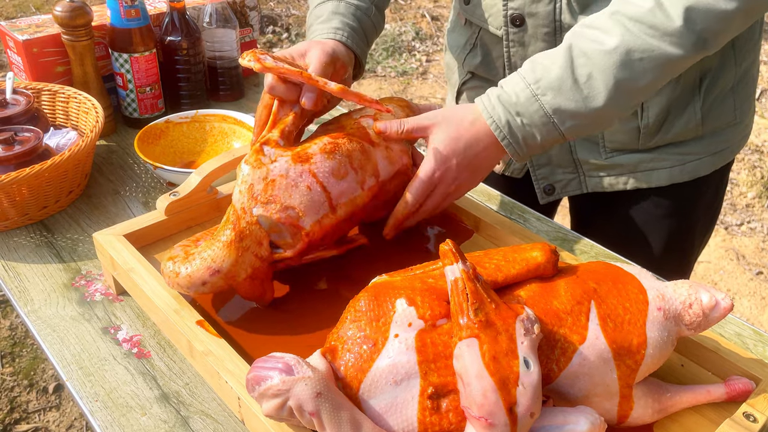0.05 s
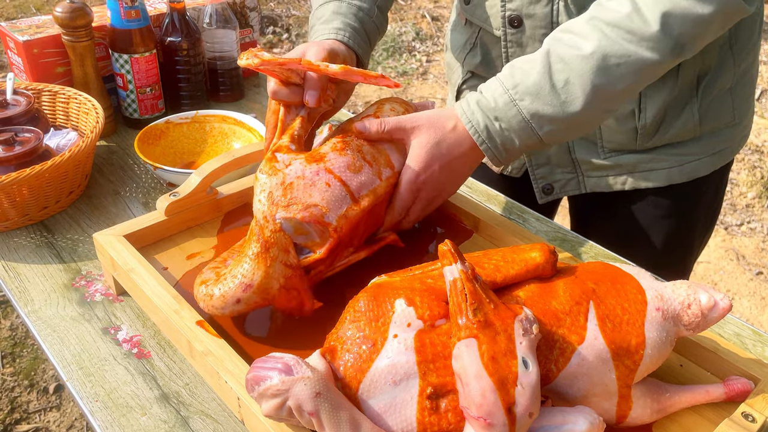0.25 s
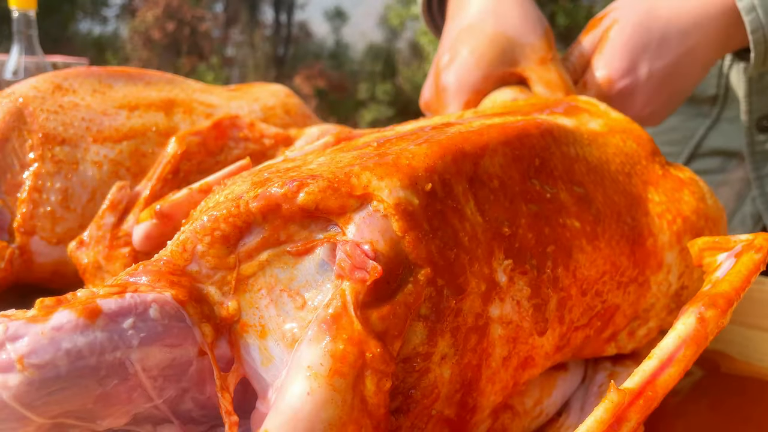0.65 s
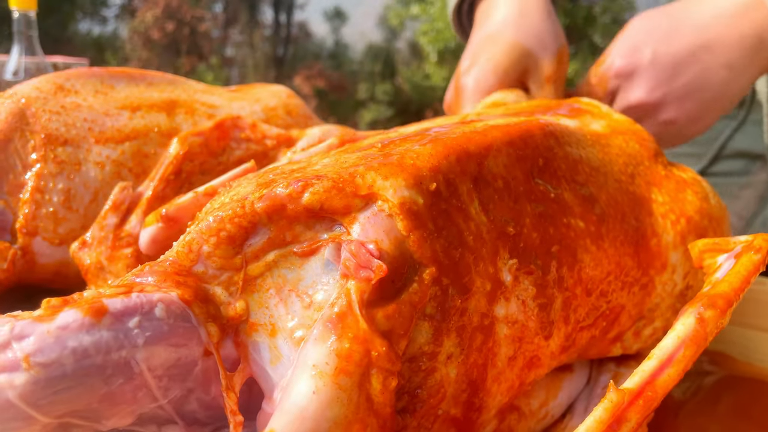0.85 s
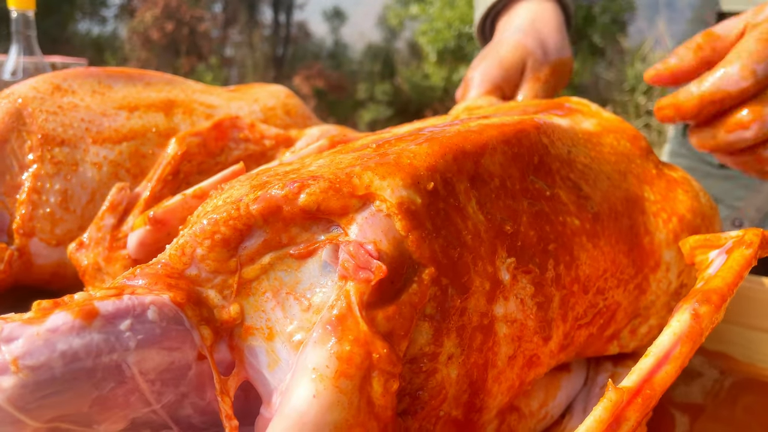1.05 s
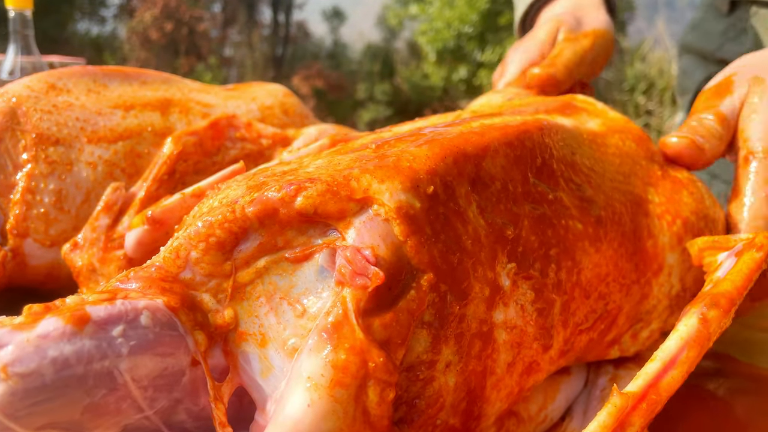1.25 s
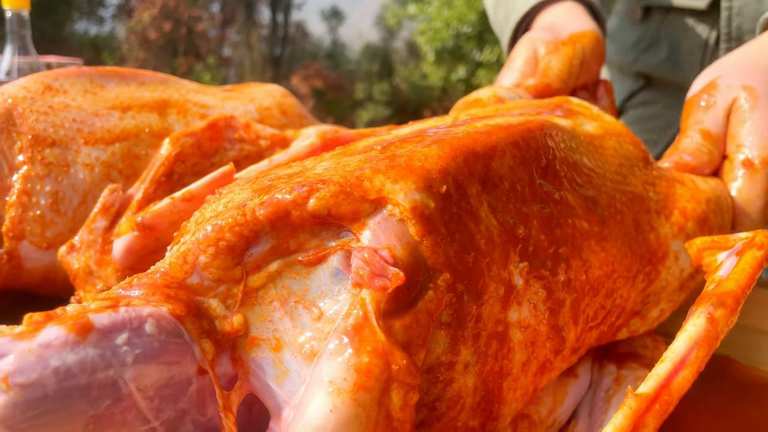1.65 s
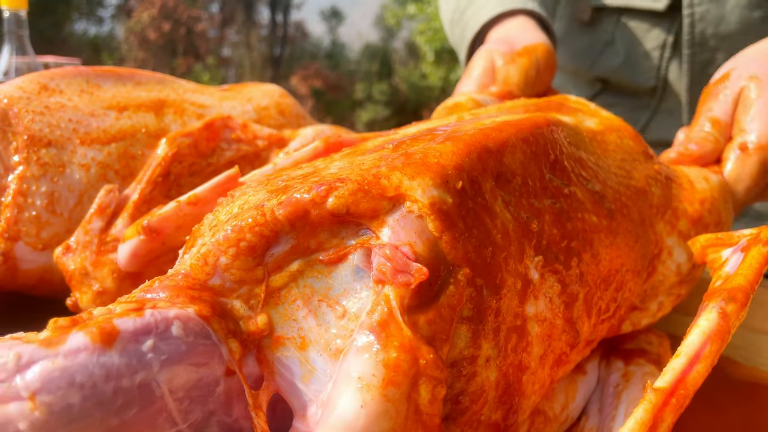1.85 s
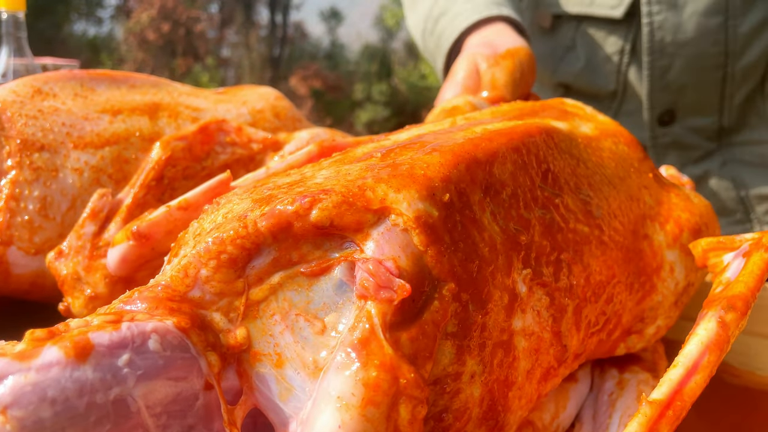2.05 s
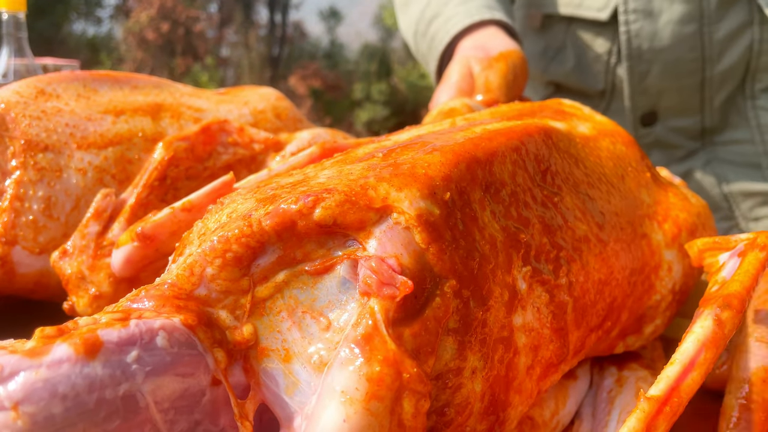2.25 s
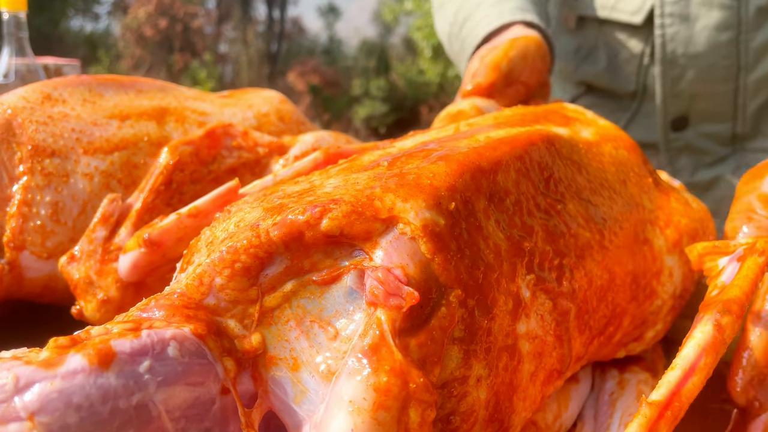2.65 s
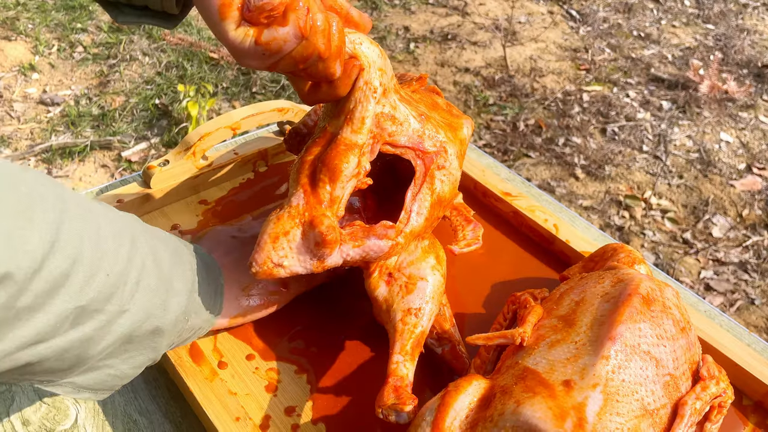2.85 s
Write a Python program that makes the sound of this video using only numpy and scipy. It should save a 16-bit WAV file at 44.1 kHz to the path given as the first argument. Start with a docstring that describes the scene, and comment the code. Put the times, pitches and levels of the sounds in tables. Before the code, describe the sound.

Wet rubbing, sticky smacks and soft thuds of hands on raw poultry, with distant bird chatter.

```python
"""Hands work wet marinade into a raw bird on a wooden tray, outdoors, close by, over a faint hush.
From the start, palms rub wet skin and the flesh thuds and rumbles on the tray.
From 0.5 s, a wild bird further off chatters in short rasping notes, echoed by the trees.
From 1.3 s, the work gets firmer: the sticky film smacks and pops, the tray rings, fingers squeak.
At 2.4 s comes the sharpest smack, then a jacket sleeve swishes and the flesh thuds once more."""
import sys
import numpy as np
from scipy import signal
from scipy.fft import rfft, irfft, next_fast_len
from scipy.io import wavfile
from scipy.ndimage import uniform_filter1d, map_coordinates

SR = 44100
rng = np.random.default_rng(int(sys.argv[2]) if len(sys.argv) > 2 else 0)


def transcribe(signal):
    """Save signal, clipped to [-1, 1], as a 16-bit WAV file at the path in sys.argv[1]."""
    frames = np.atleast_2d(signal).T
    limited = np.clip(frames, -1, 1)
    pcm = np.round(limited * 32767).astype(np.int16)
    wavfile.write(sys.argv[1], SR, pcm)


N = 132300
T = np.arange(N) / SR

# flesh on the tray (peak time [s], level [dB], pitch [Hz], left-right [dB])
THUDS = [(0.223, -44.5, 98, 6.5), (0.288, -40.5, 71.6, 2.5), (0.612, -41.5, 125, 0.5),
         (0.684, -41.5, 95, 3), (0.712, -43.5, 164, 3), (.742, -45.5, 108, -3), (0.831, -51, 344, -0.5),
         (1.063, -48.5, 134, 5.5), (1.24, -47, 104, 11), (1.3446, -44, 183, 3.5), (1.394, -49, 260, 2),
         (1.349, -43, 85.5, 9), (1.412, -44, 90, 6), (1.484, -35, 109, 13), (1.481, -44, 240, 2),
         (1.511, -40.5, 135, 7), (1.568, -48, 280, 0), (1.595, -35.5, 273, 2), (1.62, -44, 116, 3),
         (1.656, -45.5, 175, 0), (1.674, -39.5, 88, 8), (1.725, -40.5, 190, 4.5), (1.798, -48, 194, 3),
         (1.834, -49.5, 166, 5), (1.956, -37, 90, -0.5), (1.949, -45.5, 224, 3), (2.335, -47.5, 176, 6),
         (2.736, -41.5, 100, 5.5), (2.756, -47, 196, 4)]
# rumble envelope (time [s], level [dB])
RUMBLE_ENVELOPE = [(0.0, -65), (0.02, -56), (0.15, -67), (0.29, -49.5), (0.39, -58), (0.6, -47),
                   (0.645, -49), (0.69, -43.5), (0.79, -52.5), (0.93, -51.5), (0.98, -46.5), (1.04, -56),
                   (1.14, -47), (1.18, -55.5), (1.25, -44), (1.31, -59), (1.34, -44), (1.46, -41),
                   (1.48, -41), (1.91, -54), (1.96, -47), (2.0, -55.5), (2.11, -51.5), (2.13, -48),
                   (2.33, -57.5), (2.39, -46), (2.43, -50), (2.64, -58), (2.66, -44.5), (2.75, -45.5),
                   (2.77, -50), (2.97, -57.5), (3.0, -75)]
# rumble colour (frequency [Hz], level [dB])
RUMBLE_SPECTRUM = [(15, -47), (30, -20.5), (45, -2), (60, 2), (75, -2), (100, -9.5), (135, -17), (200, -27),
                   (300, -35.5), (500, -54.5), (1000, -72)]
# wet smacks (time [s], level [dB], decay [s], tilt [dB/octave], air pocket [Hz], left-right [dB])
SMACKS = [(.451, -55, 0.00089, -1, 5300, 9), (0.624, -65.5, 0.0028, 4, 6800, -2),
          (0.781, -56.5, 0.0025, 5, 9300, -3), (0.827, -71, .004, -10, 1200, 0),
          (1.2644, -41.5, 0.0038, 2, 3150, -0.5), (1.288, -54, 0.0028, 4, 6340, 7),
          (1.3235, -46.5, 0.0046, -0.5, 6400, -4.5), (1.341, -36.5, .0036, 1.5, 2800, -0.5),
          (1.384, -48, .0025, -6, 2000, 2), (1.3906, -42.5, 0.0033, 5, 6900, 7.5),
          (1.392, -41.5, 0.0029, 2, 7060, 2), (1.483, -50, 0.011, -0.5, 2060, -2),
          (1.651, -60, .0016, 27, 10800, -11), (1.741, -62, 0.0079, 3, 9800, -3),
          (1.783, -52.5, 0.0014, -5, 1600, -10), (1.902, -55, 0.0024, 0, 7000, -3),
          (2.0995, -48, .003, 10, 6650, 7), (2.363, -42.5, 0.0058, 0, 2070, 2),
          (2.378, -48, 0.0097, -4.5, 6650, -4), (2.3893, -25.5, 0.0013, -1.5, 9700, -4.5),
          (2.39, -29, 0.0025, 0, 2530, -4.5), (2.565, -36.5, 0.0025, -4, 1610, -7),
          (2.676, -50, 0.0019, -0.5, 9000, -9.5)]
# tearing film colour (frequency [Hz], level [dB])
SNAP_SPECTRUM = [(200, -4.5), (600, -12), (1000, -12), (1600, 1.5), (2500, -2), (3500, -6.5), (5000, -10.5),
                 (5750, -22), (6500, -9.5), (8000, -16), (9400, -12), (11000, -19), (13000, -35)]
# crackling stretches (start [s], length [s], level [dB])
CRACKLES = [(0.43, 0.034, -62.5), (1.264, .16, -58.5), (1.715, 0.047, -66), (1.831, 0.047, -64),
            (2.108, .19, -64.5), (2.359, .05, -61)]
# bursting air pockets (time [s], level [dB], pitch [Hz], left-right [dB])
POPS = [(1.3435, -50, 2200, -13), (1.393, -44, 6850, 1), (2.092, -55.5, 6760, -7), (2.1, -48.5, 6710, -4),
        (2.3906, -37.5, 9250, -16.5), (2.3912, -37, 2510, -11), (2.564, -43, 1586, -6.5)]
# knocks on the tray (time [s], level [dB])
KNOCKS = [(1.343, -49), (1.393, -47.5), (1.483, -53.5), (2.391, -51)]
# tray modes (frequency [Hz], level [dB], T60 [s])
TRAY_MODES = [(430, -15, 0.021), (551, -5, 0.066), (595, -5, 0.052), (1220, -32, 0.12), (1670, -24, 0.018),
              (2090, -5.5, 0.028)]
# palm strokes (start [s], length [s], level [dB], tilt [dB/octave], palm hollow [Hz])
RUBS = [(0.029, 0.18, -66, 0.5, 1200), (0.2, 0.12, -73.5, -0.5, 1580), (0.315, 0.053, -63, -1.5, 850),
        (0.427, 0.016, -67.5, .5, 1460), (0.457, 0.097, -74.5, 1, 2000), (0.769, 0.24, -71.5, 0, 1450),
        (1.022, 0.13, -73, 0, 577), (1.256, 0.051, -66, 3.5, 570), (1.334, 0.12, -65.5, 1.5, 560),
        (1.465, 0.16, -63.5, -2.5, 382), (1.589, 0.35, -72.5, 1, 390.5), (1.839, 0.041, -63.5, -1.5, 2370),
        (1.883, 0.2, -74.5, 0, 1800), (2.075, 0.25, -65, 0.4, 3000), (2.115, 0.24, -67, -1, 446),
        (2.344, 0.065, -59.5, 1.5, 2400), (2.405, 0.058, -64, -0.5, 1280), (2.791, 0.058, -68, -2, 970)]
# skin friction colour (frequency [Hz], level [dB])
RUB_SPECTRUM = [(80, -43), (250, -2.5), (400, -0.5), (600, -1.5), (780, -4.5), (1100, -11), (1600, -7.5),
                (2050, -6), (2640, -12.5), (3500, -16), (5450, -22), (8000, -25.5), (9300, -26),
                (12200, -37), (15000, -78)]
# finger stick-slip runs (start [s], length [s], level [dB], pitch [Hz], left-right [dB])
SQUELCHES = [(0.166, 0.032, -60, 1960, -7.5), (0.425, 0.02, -62, 1530, -2), (1.047, 0.021, -59, 2030, -7),
             (1.6995, 0.032, -53.5, 1840, -8), (1.736, 0.011, -54.5, 2120, -4.5),
             (1.843, 0.041, -64, 2400, -13), (1.907, .014, -58, 2110, -5.5),
             (1.937, 0.026, -65.5, 1640, -8), (2.797, 0.027, -63, 2360, -13.5)]
# sleeve swish (time [s], level [dB])
SLEEVE_ENVELOPE = [(2.42, -96), (2.46, -72.5), (2.52, -63), (2.57, -56.5), (2.625, -59), (2.668, -67),
                   (2.74, -86)]
# cloth colour (frequency [Hz], level [dB])
CLOTH_SPECTRUM = [(300, -7.5), (620, -5.5), (950, -14.5), (1230, -3), (1420, -7.5), (1600, 0), (1850, -7),
                  (2380, -2.5), (3100, -14.5), (3900, -7.5), (4700, -14), (5250, -10), (5500, -7),
                  (5850, -13.5), (7200, -12), (8000, -11.5), (9300, -15.5), (12200, -42), (15000, -66)]
# cloth balance (frequency [Hz], left-right [dB])
CLOTH_PAN = [(400, 1), (1200, -6.5), (3000, -4.5), (7000, -2.5), (8200, 4), (9300, -21.5), (12000, -19)]
# wild bird's notes (start [s], length [s], level [dB], pitch [Hz])
BIRD_NOTES = [(0.46, 0.025, -61, 3227), (0.518, 0.024, -63, 3210), (0.755, 0.021, -65.5, 3200),
              (0.796, 0.023, -62.5, 3230), (0.843, 0.017, -59.5, 3230), (0.894, 0.013, -59, 3188),
              (1.381, 0.01, -68, 3180), (1.418, 0.021, -63.5, 3270), (1.467, 0.018, -66.5, 3230),
              (1.513, 0.024, -64, 3197), (1.569, 0.023, -66, 3180), (2.068, 0.011, -71, 2910),
              (2.115, 0.017, -70.5, 3150), (2.162, 0.011, -64.5, 3170), (2.197, 0.021, -67, 3230),
              (2.262, 0.015, -67.5, 3156), (2.793, 0.016, -72.5, 2950), (2.847, 0.0076, -69.5, 3050),
              (2.876, 0.0053, -75, 2930)]
# throat resonance (frequency [Hz], level [dB])
THROAT_SPECTRUM = [(600, -56), (1200, -20.5), (1600, -8.5), (2400, -19), (2850, -2.5), (3200, -2),
                   (3500, -1), (4200, -11.5), (5000, -17), (7000, -136)]
# tree echo colour (frequency [Hz], level [dB])
ECHO_SPECTRUM = [(700, -59), (1500, -43), (2400, -1), (2900, 3), (3300, 11.5), (3700, 4), (4300, 2),
                 (5200, -31), (7000, -34)]
# hush colour (frequency [Hz], level [dB])
AIR_SPECTRUM = [(30, -27), (200, -9), (400, 1), (600, -1.5), (800, -2.5), (1100, -9.5), (1600, -6.5),
                (2500, -12.5), (4000, -13), (5600, -17), (8000, -18.5), (9400, -21.5), (11000, -24),
                (13000, -43)]
# hush balance (frequency [Hz], left-right [dB])
AIR_PAN = [(200, 0), (1500, -3), (7000, 3.5), (9400, -12.5), (12000, -5.5)]

SKIN_PAN_DB = -3.5


def thuds(rise_cycles=0.32, fall_cycles=0.51, slack_s=0.0015, sag=0.32):
    """Each push of soft flesh swells, swings about two cycles and sags in pitch as it relaxes."""
    out = np.zeros((2, N))
    for peak_s, db, hz, pan_db in THUDS:
        cycles = hz * (T - peak_s)
        width_cycles = np.where(cycles < 0, rise_cycles, fall_cycles) + hz * slack_s
        swell = np.exp(-0.5 * (cycles / width_cycles) ** 2)
        swing = np.cos(2 * np.pi * (cycles - sag * (np.hypot(cycles, 1) - 1)))
        out += amp(db) * pan(pan_db) * swell * swing
    return out


def rumble(trim_db=-2.5, shove_db=2.5, shoves_per_s=22):
    """The carcass rumbles as it is pushed about in uneven shoves."""
    noise = coloured_noise(RUMBLE_SPECTRUM, correlation=0.85)
    power = uniform_filter1d(np.mean(noise ** 2, axis=0), size=1800)
    steady = noise / np.sqrt(np.abs(power) + 1e-6)
    return steady * envelope(RUMBLE_ENVELOPE, T) * amp(trim_db + shove_db * wobble(shoves_per_s))


def smacks():
    """Fingers land on wet skin and peel off."""
    out = np.zeros((2, N))
    for start_s, db, decay_s, tilt_db, pocket_hz, pan_db in SMACKS:
        add(out, start_s, pan(pan_db) * film_snap(db, decay_s, tilt_db, pocket_hz))
    return out


def film_snap(db, decay_s, tilt_db, pocket_hz, tail_db=-23.5, tail_s=0.011):
    """Sticky film tears in tiny snaps, coloured by the air pocket below; the tray reflects a tail."""
    t = T[:SR // 16]
    noise = stereo_noise(len(t), correlation=0.5)
    grain = np.exp(0.52 * np.repeat(rng.standard_normal(len(t)), 16)[:len(t)])
    pocket = lambda hz: resonance(hz, pocket_hz, db=8.5, octaves=0.23)
    burst = filtered(noise * grain, lambda hz: tilted(SNAP_SPECTRUM, hz, tilt_db) * pocket(hz))
    rise = 1 - np.exp(-t / (0.48 * decay_s))
    fall = np.exp(-t / decay_s) + amp(tail_db) * np.exp(-t / tail_s)
    shape = 2 * rise * fall
    return amp(db - 11) * unit_rms(burst * shape) * np.sqrt(np.mean(shape ** 2))


def crackle(ticks_per_s=130, centre_hz=3540, spread_octaves=0.59):
    """Threads of marinade part at random between the smacks."""
    out = np.zeros((2, N))
    for start_s, length_s, db in CRACKLES:
        for scatter_db, detune in rng.standard_normal((round(length_s * ticks_per_s), 2)):
            pocket_hz = centre_hz * 2 ** (spread_octaves * detune)
            tick = film_snap(db + scatter_db, decay_s=0.0027, tilt_db=0, pocket_hz=pocket_hz)
            add(out, start_s + length_s * rng.random(), pan(SKIN_PAN_DB) * tick)
    return out


def pops(life_cycles=5.8, glide=0.011):
    """Air pockets burst in the wet film and ring a few cycles, rising slightly in pitch."""
    out, t = np.zeros((2, N)), T[:SR // 40]
    for start_s, db, hz, pan_db in POPS:
        age = hz * t / life_cycles
        shape = (1 - np.exp(-2 * hz * t)) * np.exp(-age)
        ring = np.sin(2 * np.pi * hz * t * (1 + glide * np.tanh(age / 2)))
        add(out, start_s, amp(db) * pan(pan_db) * shape * ring)
    return out


def tray(pan_db=-11.5, rise_s=0.00026):
    """Firm contacts briefly ring the modes of the wood."""
    out, t = np.zeros((2, N)), T[:SR // 6]
    for start_s, db in KNOCKS:
        ring = np.zeros(len(t))
        for hz, mode_db, t60_s in TRAY_MODES:
            decay = amp(mode_db + rng.normal(0, 1.6) - 60 * t / t60_s)
            ring += decay * np.sin(2 * np.pi * hz * (1 + 0.02 * rng.normal()) * t)
        add(out, start_s, amp(db) * pan(pan_db) * ring * (1 - np.exp(-t / rise_s)))
    return out


def rubs(grains_per_s=300, rise_s=0.0025, fall_s=0.036):
    """A cupped palm drags over bumpy wet skin: grainy friction, swelling mid-stroke."""
    out, t = np.zeros((2, N)), T[:SR // 2]
    for start_s, length_s, db, tilt_db, hollow_hz in RUBS:
        grains = stereo_noise(len(t), correlation=0.14) * np.exp(0.23 * wobble(grains_per_s)[:len(t)])
        hollow = lambda hz: resonance(hz, hollow_hz, db=4.5, octaves=0.39)
        friction = filtered(rippled(grains), lambda hz: tilted(RUB_SPECTRUM, hz, tilt_db) * hollow(hz))
        press = gate(t, length_s, rise_s, fall_s)
        arch = 1 - 0.48 * (1 - np.sin(np.pi * np.minimum(t / length_s, 1)))
        add(out, start_s, amp(db) * pan(SKIN_PAN_DB) * press * arch * unit_rms(friction))
    return out


def rippled(x, depth_db=3, width_hz=172.5, life_s=0.0284):
    """Narrow resonances come and go at random under the palm."""
    hz, t, spectra = signal.stft(x, SR, nperseg=512)
    grid = np.array(np.meshgrid(hz / width_hz, t / life_s, indexing="ij"))
    ripple = map_coordinates(rng.standard_normal((256, 32)), grid, mode="mirror")
    return signal.istft(spectra * amp(depth_db * ripple), SR, nperseg=512)[1][:, :x.shape[1]]


def squelches(period_s=0.0064):
    """Fingers stick and slip on skin: an uneven run of short damped tones."""
    out, t = np.zeros((2, N)), T[:SR // 80]
    for start_s, length_s, db, hz, pan_db in SQUELCHES:
        cycles = hz * t
        for k, (jitter, detune, size) in enumerate(rng.standard_normal((10, 3))):
            offset_s = period_s * (k + 0.087 * jitter)
            slip = cycles * np.exp(1 - cycles) * np.sin(2 * np.pi * cycles * (1 + 0.1 * detune))
            fade = np.clip((length_s - offset_s) / period_s, 0, 1)
            add(out, start_s + offset_s, amp(db + 2 * size) * fade * pan(pan_db) * slip)
    return out


def sleeve(split_hz=4000, skew_s=0.013):
    """Cloth rasps on cloth as the arm draws back; the treble peaks a little later."""
    rasp = coloured_noise(CLOTH_SPECTRUM, correlation=0.14) * np.exp(0.16 * wobble(400))
    cloth = filtered(rasp, lambda hz: pan(log_interp(CLOTH_PAN, hz)))
    treble = filtered(cloth, lambda hz: hz ** 4 / (hz ** 4 + split_hz ** 4))
    body = cloth - treble
    return body * envelope(SLEEVE_ENVELOPE, T + skew_s) + treble * envelope(SLEEVE_ENVELOPE, T - skew_s)


def wild_bird(throat_hz=3305, rasp_hz=96.7, whistle_db=5.5):
    """Harsh pulsed notes, noise and whistle around one throat resonance, with their echo."""
    notes, t = np.zeros((2, N)), T[:SR // 16]
    rasp_rad = 2 * np.pi * rasp_hz * t
    for start_s, length_s, db, pitch_hz in BIRD_NOTES:
        throat = lambda hz: amp(log_interp(THROAT_SPECTRUM, hz * throat_hz / pitch_hz))
        hoarse = unit_rms(filtered(rng.standard_normal(len(t)), throat))
        drift_rad = np.cumsum(rng.normal(0, 0.052, len(t)))
        whistle = amp(whistle_db) * np.sin(2 * np.pi * pitch_hz * t + np.sin(rasp_rad) + drift_rad)
        voice = unit_rms((hoarse + whistle) * (1 - 0.25 * np.cos(rasp_rad)))
        add(notes, start_s, amp(db) * gate(t, length_s, rise_s=0.0068, fall_s=0.0011) * voice)
    return lagged(notes, lag_s=0.000701) + tree_echo(notes[0])


def tree_echo(x, db=-3.5, t60_s=0.37, rise_s=0.0087):
    """Trees scatter the call: diffuse noise follows its smeared power."""
    power_response = amp(-120 * T / t60_s) * (1 - np.exp(-T / rise_s)) ** 2
    power = signal.fftconvolve(x ** 2, power_response)[:N]
    swell = np.sqrt(np.abs(power) * np.log(1e6) / (t60_s * SR))
    return amp(db) * swell * coloured_noise(ECHO_SPECTRUM, correlation=0.29)


def air(db=-77.5):
    """Faint outdoor hush, wavering slowly."""
    gain = amp(db + 0.6 * wobble(3.32))
    hush = coloured_noise(AIR_SPECTRUM, correlation=0.06)
    return gain * filtered(hush, lambda hz: pan(log_interp(AIR_PAN, hz)))


def mic_ports(hz):
    """Microphone port gains: the left is dull, the right resonates."""
    return np.array([1 / np.hypot(1, (hz / 8900) ** 10), resonance(hz, 9150, db=5.5, octaves=0.085)])


def amp(db):
    """Decibels to gain."""
    return 10 ** (np.asarray(db) / 20)


def unit_rms(x):
    """x scaled to rms 1."""
    return x / np.sqrt(np.mean(x ** 2) + 1e-20)


def pan(db):
    """Stereo gains for a left-right level difference."""
    return amp(np.array([[1], [-1]]) * db / 2)


def envelope(points, t):
    """Gain at t from (time [s], level [dB]) points."""
    return amp(np.interp(t, *np.transpose(points)))


def gate(t, length_s, rise_s, fall_s):
    """Linear rise, hold to length_s, exponential fall."""
    return np.clip(t / rise_s, 0, 1) * np.exp(-np.maximum(t - length_s, 0) / fall_s)


def log_interp(points, hz):
    """(frequency [Hz], value) points read on a log axis."""
    knots_hz, values = np.transpose(points)
    return np.interp(np.log(hz + 1), np.log(knots_hz + 1), values)


def tilted(spectrum, hz, tilt_db):
    """Gain of a spectrum tilted by tilt_db per octave about 2 kHz."""
    return amp(log_interp(spectrum, hz) + tilt_db * np.log2(np.maximum(hz, 250) / 2000))


def resonance(hz, centre_hz, db, octaves):
    """Gain of a bell-shaped boost on a log axis."""
    return amp(db * np.exp(-0.5 * (np.log2((hz + 1) / centre_hz) / octaves) ** 2))


def wobble(knots_per_s):
    """Smooth random curve."""
    return map_coordinates(rng.standard_normal(int(N * knots_per_s / SR) + 4), [T * knots_per_s])


def stereo_noise(size, correlation):
    """White noise with partly alike sides."""
    mid, side = rng.standard_normal((2, size))
    angle = np.arccos(correlation) / 2
    return np.cos(angle) * mid + np.sin(angle) * np.array([side, -side])


def coloured_noise(spectrum, correlation):
    """Shaped stereo noise of rms 1."""
    return unit_rms(filtered(stereo_noise(N, correlation), lambda hz: amp(log_interp(spectrum, hz))))


def filtered(x, gain):
    """x with gain(hz) applied to its spectrum."""
    n = x.shape[-1]
    padded = next_fast_len(n + n // 4)
    return irfft(rfft(x, padded) * gain(np.fft.rfftfreq(padded, 1 / SR)), padded)[..., :n]


def lagged(x, lag_s):
    """The left side hears x lag_s later than the right."""
    return filtered(x, lambda hz: np.exp(-1j * np.pi * hz * lag_s * np.array([[1], [-1]])))


def add(out, start_s, x):
    """Mixes x into out from start_s."""
    part = out[:, max(round(start_s * SR), 0):][:, :x.shape[-1]]
    part += x[..., :part.shape[1]]


def scene():
    """Flesh, hands and tray close by; wild bird and hush behind."""
    skin = filtered(smacks() + crackle() + rubs(), mic_ports)
    hands = skin + pops() + tray() + squelches() + sleeve()
    flesh = lagged(thuds(), lag_s=0.00089) + rumble()
    return flesh + lagged(hands, lag_s=-0.00018) + wild_bird() + air()


def record(dry):
    """Steep low-pass at 12.4 kHz."""
    return filtered(dry, lambda hz: 1 / np.sqrt(1 + (hz / 12400) ** 36))


dry = scene()
out = record(dry)
transcribe(out)
```